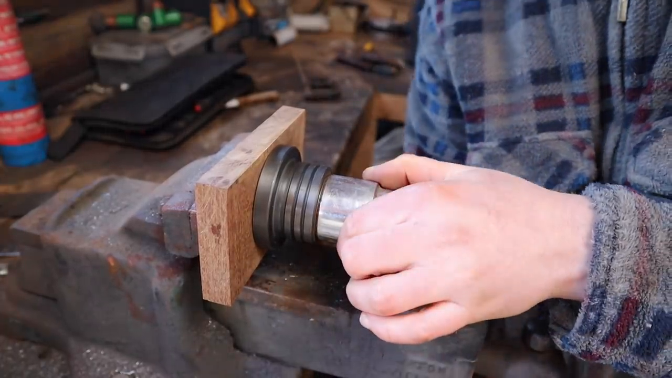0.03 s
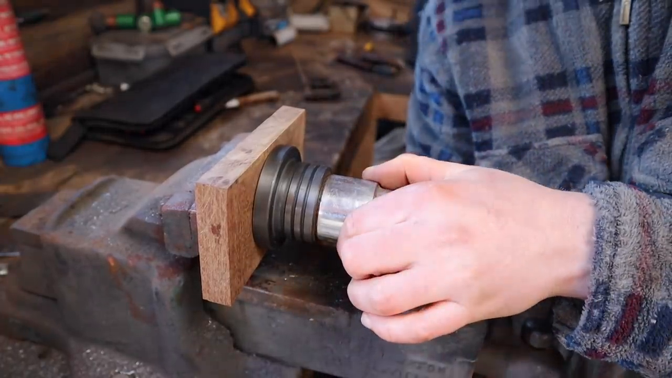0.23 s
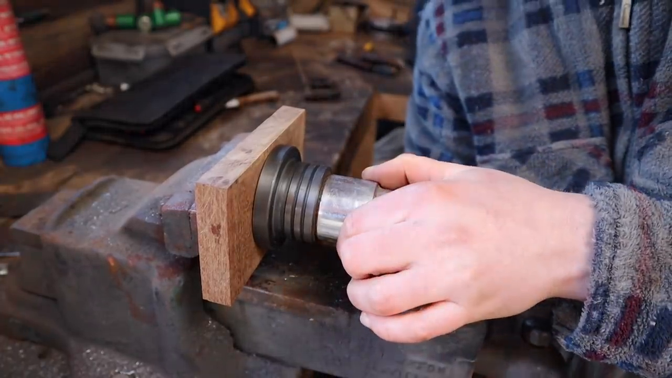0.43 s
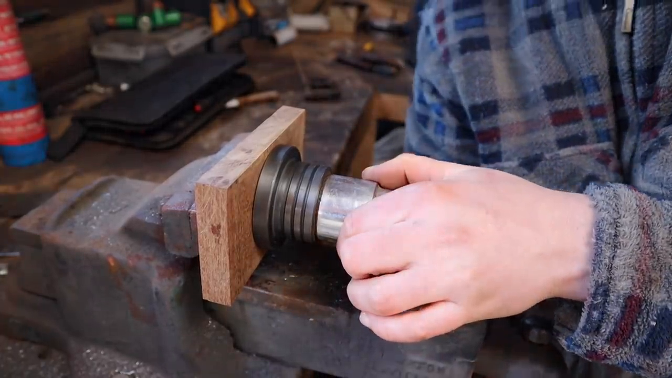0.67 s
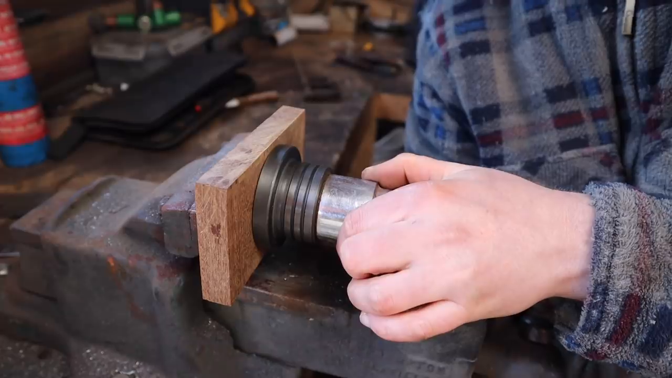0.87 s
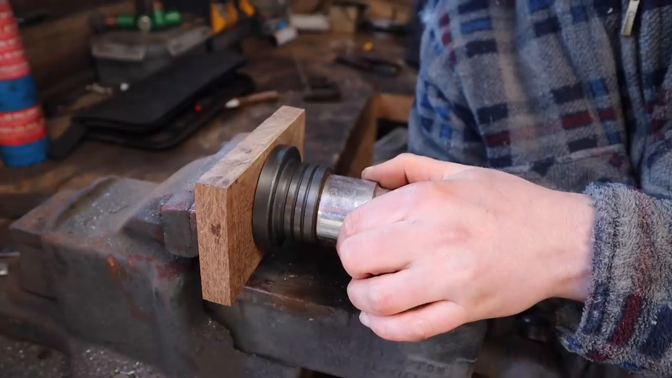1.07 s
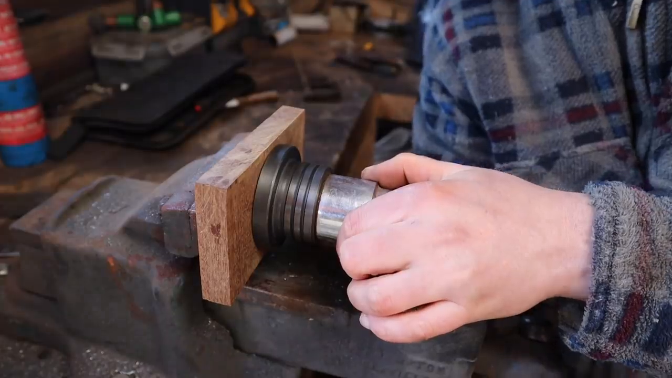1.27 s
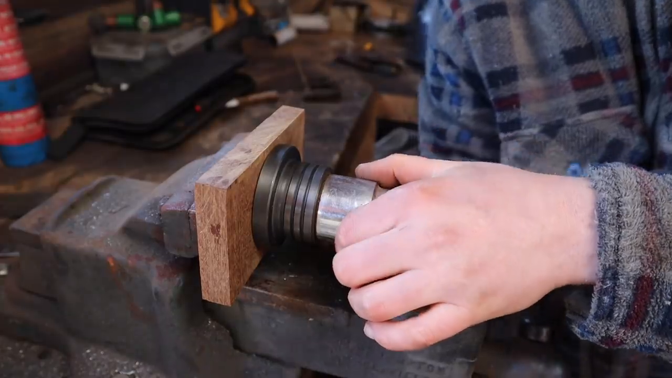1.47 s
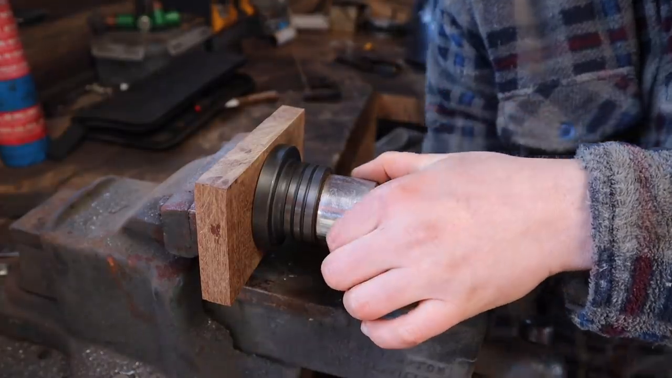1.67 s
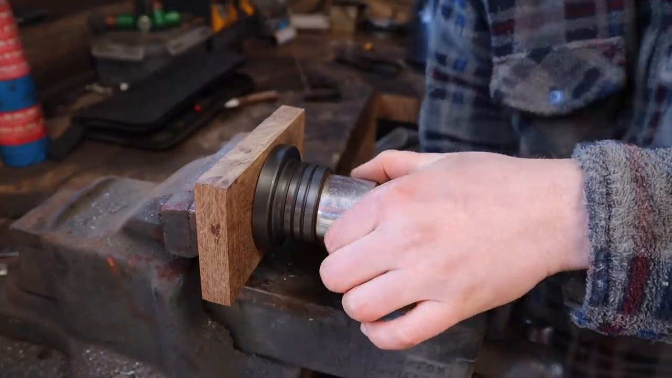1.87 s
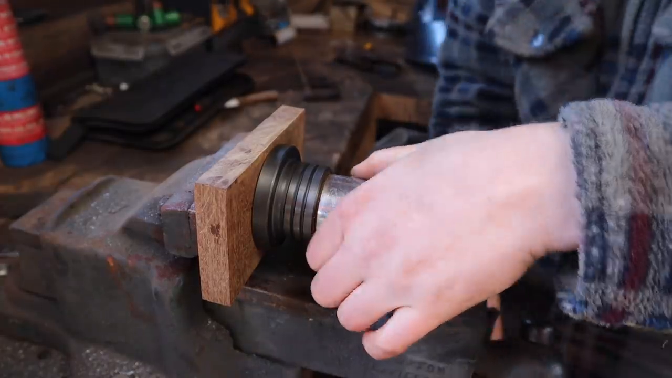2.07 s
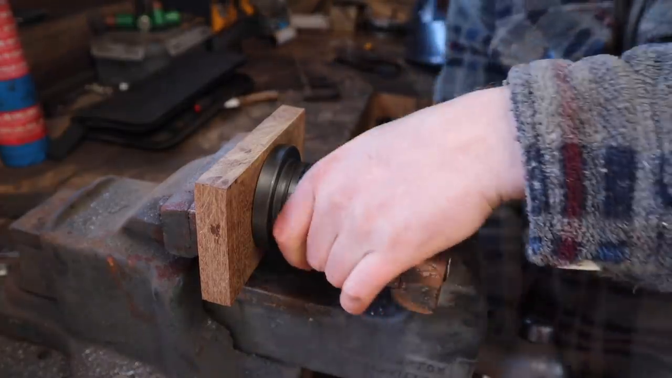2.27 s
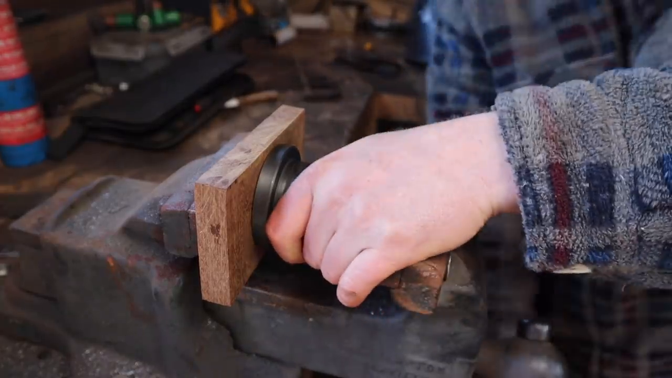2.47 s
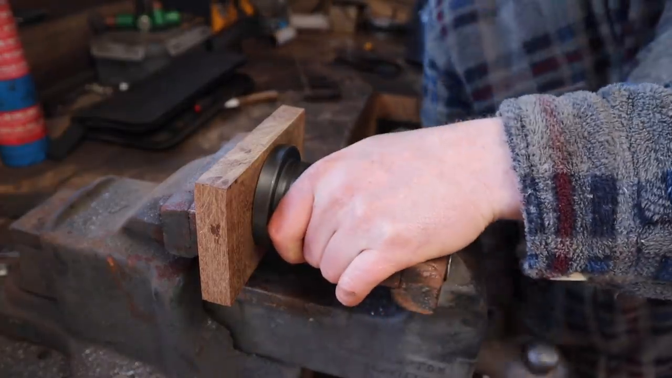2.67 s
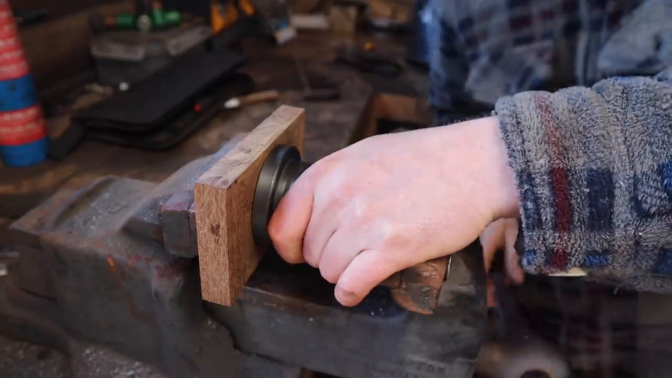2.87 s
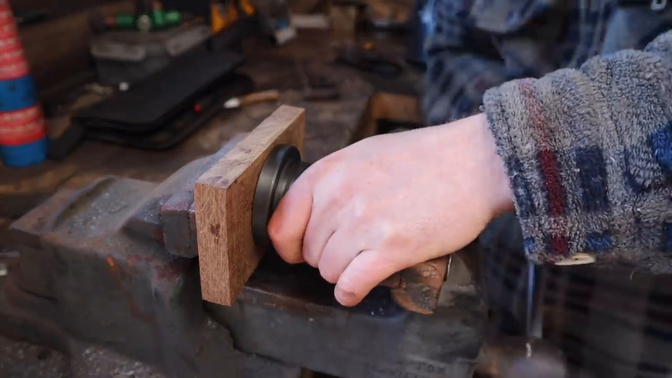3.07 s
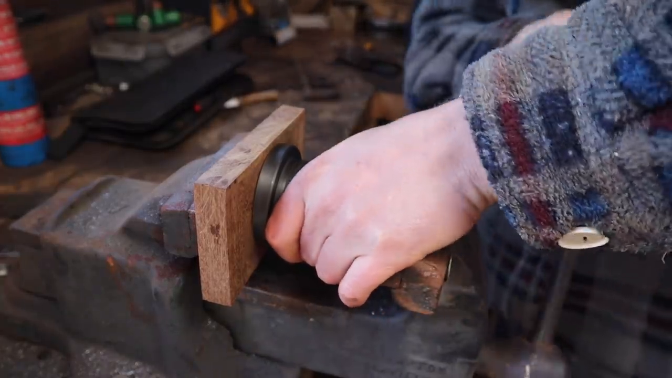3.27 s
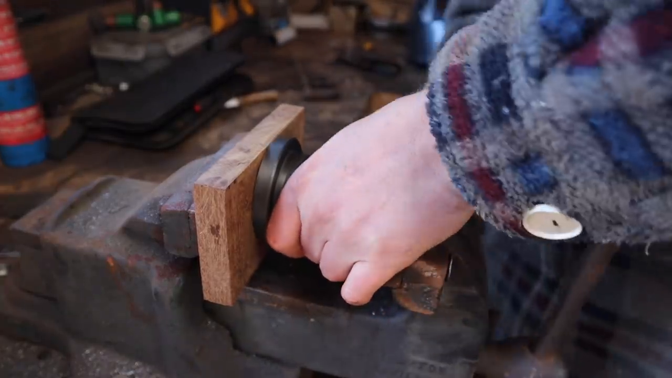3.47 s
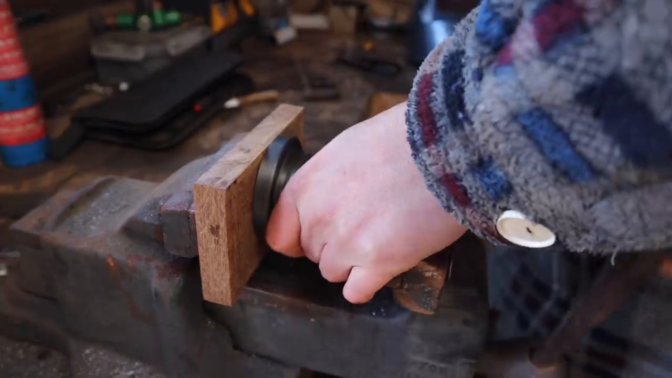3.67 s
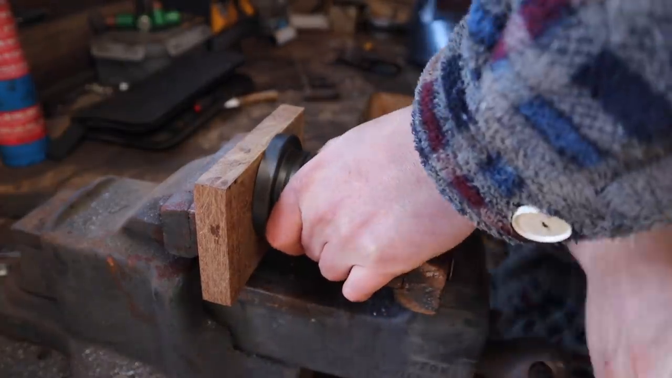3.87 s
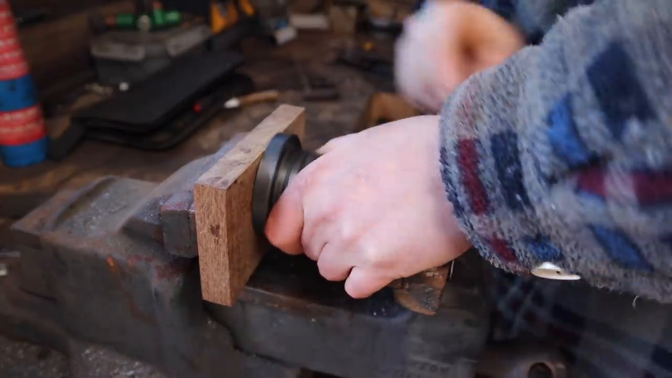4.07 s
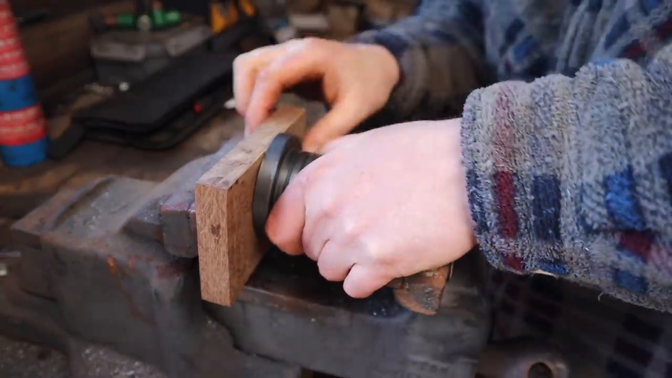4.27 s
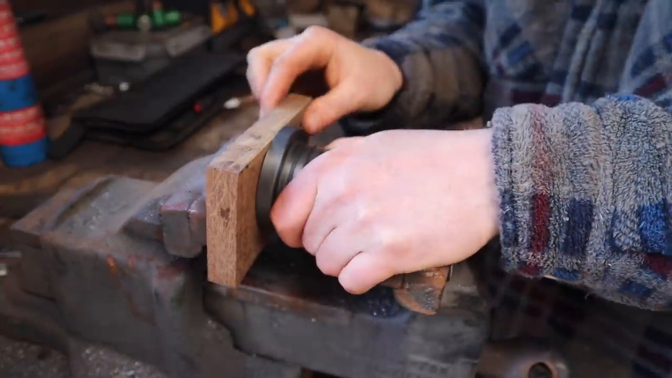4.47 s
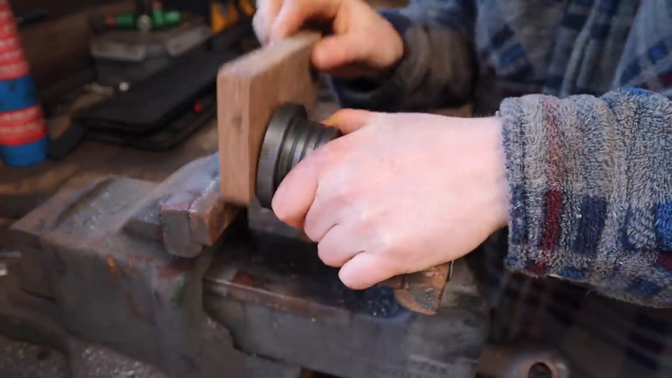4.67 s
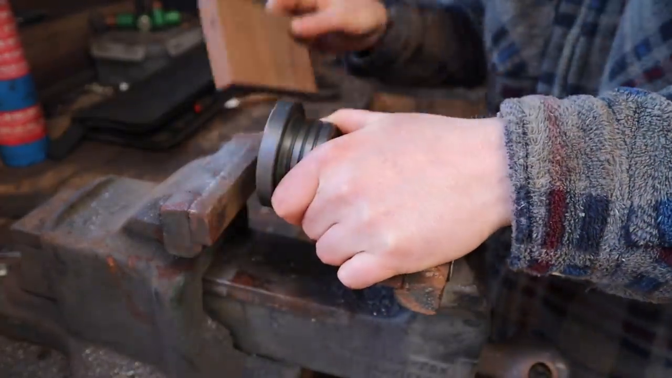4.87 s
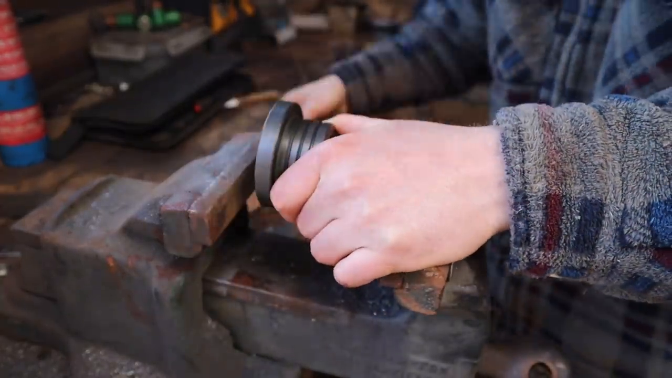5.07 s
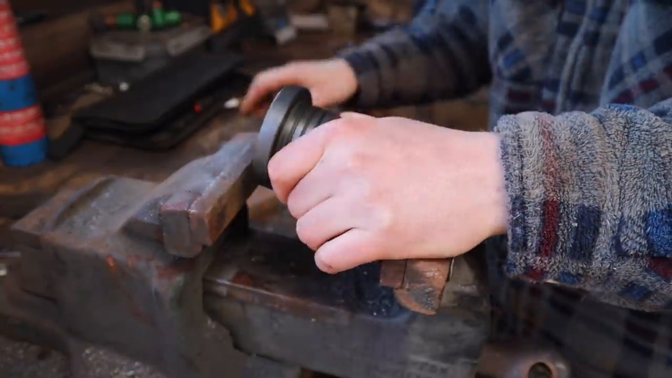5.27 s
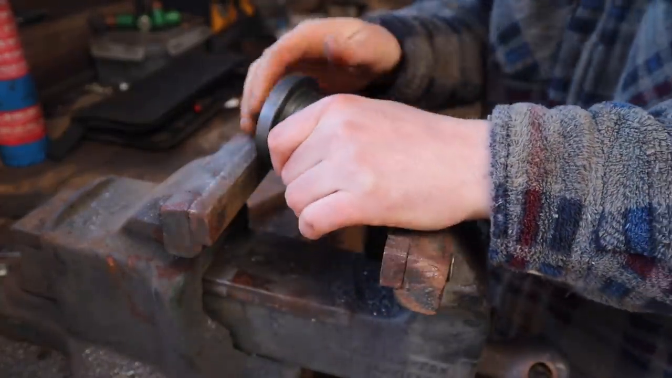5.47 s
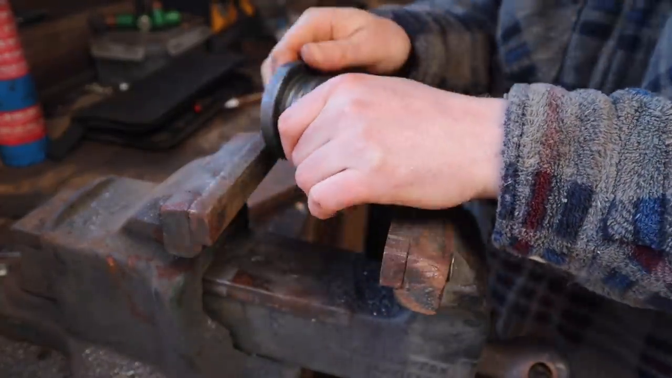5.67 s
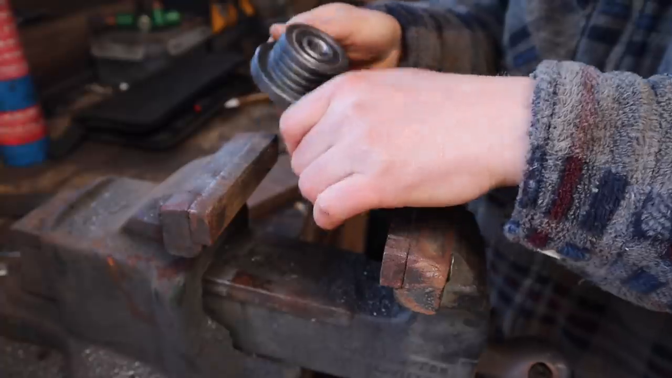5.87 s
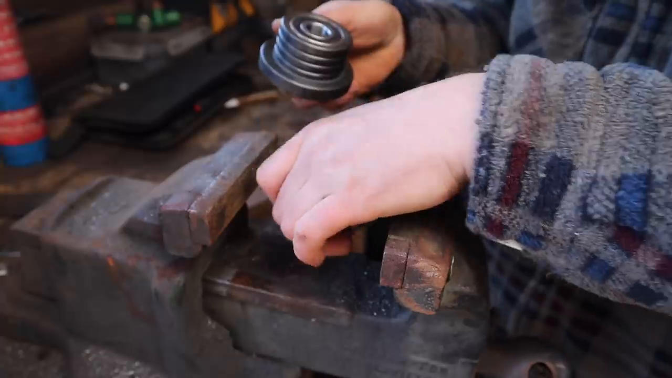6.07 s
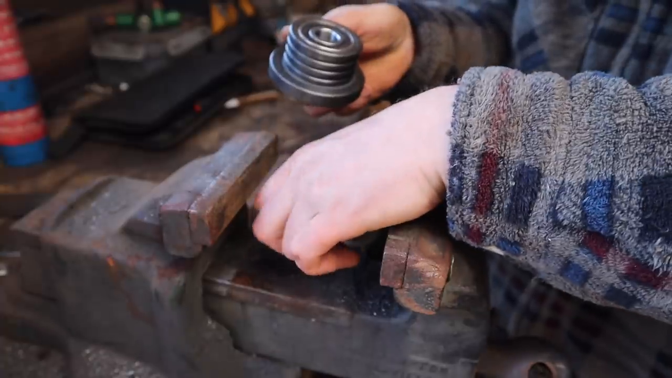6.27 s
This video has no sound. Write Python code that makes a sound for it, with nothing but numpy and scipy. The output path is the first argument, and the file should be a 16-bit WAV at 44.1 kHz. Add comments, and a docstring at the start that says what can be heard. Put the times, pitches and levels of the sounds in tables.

```python
"""Fleece sleeves rustle over the faint hum of a quiet workshop, close to a camera's two small microphones.
A bench vise is loosened: jaw and handle knock the iron and shake the bench, and the screw grinds in its
nut. A wooden block scrapes out, sticking and slipping; then a steel spacer drops, bounces and rings.
The camera widens the stereo picture and clips the highest peaks."""
import sys
import numpy as np
from scipy import signal
from scipy.fft import rfft, irfft, next_fast_len
from scipy.io import wavfile
from scipy.ndimage import uniform_filter1d, map_coordinates

SR = 44100
rng = np.random.default_rng(int(sys.argv[2]) if len(sys.argv) > 2 else 0)


def log_audio(samples):
    """Write samples as a 16-bit WAV file to the path given in sys.argv[1]."""
    # one column per channel
    frames = np.atleast_2d(samples).T
    # limit to full scale, then quantise
    limited = np.clip(frames, -1, 1)
    pcm = np.round(limited * 32767).astype(np.int16)
    wavfile.write(sys.argv[1], SR, pcm)


N = 279569


def undb(db):
    return 10 ** (np.asarray(db) / 20)


def level(x, db):
    """Set the RMS level."""
    return x * undb(db) / np.sqrt(np.mean(x ** 2))


def decay(t, t60):
    return np.exp(-np.log(1000) * t / t60)


def band(x, lo_hz, hi_hz):
    return signal.sosfilt(signal.butter(2, [lo_hz, hi_hz], "band", fs=SR, output="sos"), x)


def curve(rows):
    """Columns of a table joined by straight lines in time."""
    s, *columns = np.transpose(rows)
    return [np.interp(np.arange(N) / SR, s, c, left=-120, right=c[-1]) for c in columns]


def at_hz(points, hz):
    """Points joined by straight lines on a log-frequency axis."""
    freqs, values = np.transpose(points)
    return np.interp(np.log(hz), np.log(freqs), values)


def add(out, s, sound):
    i = int(s * SR)
    out[:, i:i + sound.shape[-1]] += sound[..., :N - i]


def rings(modes, seconds, damping=1):
    """Response of resonances to a tap; each blow lands elsewhere, so signs and sizes change."""
    t = np.arange(int(seconds * SR)) / SR
    hz, width, db = np.transpose(modes)[:, :, None]
    size = undb(db + 0.5 * rng.standard_normal(hz.shape)) * rng.choice([-1, 1], hz.shape) * width
    return np.sum(size * np.exp(-np.pi * width * damping * t) * np.sin(2 * np.pi * hz * t), axis=0)


def grit(per_s, spread_db):
    """Dense clicks of very uneven size."""
    clicks = (rng.random(N) < per_s / SR) * rng.standard_normal(N)
    return clicks * undb(spread_db * rng.exponential(size=N).clip(max=5))


def mic_pair(x, pan_db, lead_us):
    """A close source at the two microphones; positive values make the left louder and earlier."""
    size = x.shape[-1]
    hz, sides = np.fft.rfftfreq(size, 1 / SR), np.array([[.5], [-.5]])
    shade = hz ** 2 / (hz ** 2 + 300 ** 2)  # long waves bend round the camera body
    delay = np.exp(2j * np.pi * hz * sides * lead_us / 10 ** 6)
    return irfft(rfft(x) * undb(sides * pan_db * shade) * delay, size)


def diffuse(size, side_share=1):
    """Noise from all sides: alike at both microphones in the bass, different in the treble."""
    mid, side = rng.standard_normal((2, size))
    side = side_share * signal.sosfilt(signal.butter(1, 1100, "high", fs=SR, output="sos"), side)
    return np.array([mid + side, mid - side])


# The still workshop at the microphones, mid and side: f/Hz, relative density/dB
AIR_MID = [(12, -30), (20, 1), (70, 0), (101, -7.5), (134, -4), (163, -18), (301, -11), (422, -24.5),
           (718, -16), (1090, -24.5), (3340, -31.5), (12400, -41.5), (16000, -78)]
AIR_SIDE = [(12, -65.5), (20, -52.5), (134, -5), (422, 1), (485, -2), (574, -1), (802, -1.5), (3340, -11),
            (9400, -19), (11100, -18), (16000, -39)]
# Hum, centred: f/Hz, half-width/Hz, level/dB
HUM = [(67.5, 3.4, -48), (149, 12.7, -53.5)]
def air():
    """Room tone and microphone hiss, with a faint wavering hum."""
    hz = np.fft.rfftfreq(N, 1 / SR).clip(1)

    def noise(shape, db):
        return level(irfft(rfft(rng.standard_normal(N)) * shape, N), db)

    mid = noise(undb(at_hz(AIR_MID, hz)), db=-44)
    side = noise(undb(at_hz(AIR_SIDE, hz)), db=-47.5)
    for f, width, db in HUM:
        mid += noise(1 / (1 + ((hz - f) / width) ** 2), db)
    return np.array([mid + side, mid - side])


# Sleeves passing near the microphones: peak t/s, fine rustle/dB, coarse brushing/dB, swell/s
STROKES = [(0.172, -57.5, -41, 0.072), (0.392, -73, -48, 0.041), (0.752, -64, -46, 0.085),
           (1.1, -59.5, -44.5, 0.03), (1.51, -58, -43.5, 0.097), (1.97, -61, -40.5, 0.13),
           (2.414, -53, -47, 0.37), (2.58, -50, -46.5, 0.048), (2.898, -63, -52, .15),
           (3.158, -57.5, -59, 0.06), (3.33, -56.5, -51, 0.052), (3.57, -54.5, -38, 0.27),
           (3.99, -51.5, -59, 0.19), (4.12, -49.5, -38, 0.069), (4.996, -56, -45, 0.048),
           (5.46, -57.5, -46.5, 0.035), (5.62, -63, -44, 0.064), (5.82, -58, -42, 0.018),
           (5.95, -60, -46, 0.075)]
def sleeve_strokes(fade_s=0.056):
    """Fine and coarse rustle envelopes: each stroke swells to its peak and fades."""
    t = np.arange(N) / SR
    return sum(undb([[fine_db], [coarse_db]]) * np.exp(np.minimum((t - s) / swell_s, (s - t) / fade_s))
               for s, fine_db, coarse_db, swell_s in STROKES)


# The bench under the vise: f/Hz, width/Hz, gain/dB
BENCH_MODES = [(72, 8.9, 5), (132.1, 8.6, 9), (175, 62, -10), (228, 6.7, 1.5), (276, 14, -1),
               (361, 34, -8.5), (477, 63, -2.5)]
# Hands at work on it: t/s, rumble gain/dB, fleece gain/dB
HANDS = [(0.0, -44.5, -49), (1.38, -43, -48.5), (1.91, -43, -49.5), (2.21, -39, -43.5), (2.5, -46, -44.5),
         (2.9, -39, -40.5), (3.37, -35.5, -45.5), (3.55, -44, -46.5), (3.85, -36, -39), (4.18, -41, -46.5),
         (4.5, -33.5, -41.5), (4.85, -48, -50), (5.1, -38, -48), (5.61, -41, -66), (5.9, -46.5, -51),
         (6.34, -49.5, -50.5)]
def hands(knocks, shudder_s=0.024):
    """Grip, weight and blows rumble through the bench; fleece brushes over fleece and iron."""
    rumble_db, fleece_db = curve(HANDS)
    fine, coarse = sleeve_strokes()
    hold = np.exp(-2 / (shudder_s * SR))  # the bench rumbles on after each blow
    bass_power = signal.lfilter([1 - hold], [1, -hold], band(knocks, 40, 218.6) ** 2)
    shudder = undb(-6.5) * np.sqrt(bass_power)
    bench = signal.fftconvolve(grit(3000, 3.0), rings(BENCH_MODES, .2, damping=4.55))[:N]
    rumble = level(bench, 0) + level(band(rng.standard_normal(N), 58, 1400), -6.5)
    brush = diffuse(N) * (1 + 15 * uniform_filter1d(np.abs(grit(250, 1.4)), size=60))
    fleece = band(brush, 350, 3780) + 0.077 * band(brush, 1200, 2100)
    return (np.hypot(undb(rumble_db), shudder) * level(rumble, -1.82)
            + np.hypot(undb(fleece_db), coarse) * level(fleece, -5)
            + fine * level(band(brush, 7800, 11340), 0.64))


# A cuff button, close by: f/Hz, width/Hz, gain/dB
BUTTON_MODES = [(3420, 250, 5), (4770, 500, -0.5), (7500, 1200, -0.5), (10400, 1970, -10.5),
                (12480, 900, -7.5)]
# Its soft snaps: t/s, relative level/dB, decay/ms
SNAPS = [(0.741, -47, 3), (0.992, -47.5, 4.4), (1.081, -46.5, 3), (1.094, -42, 4), (3.238, -44, 3.2),
         (3.881, -39, 6.2)]
def cuff_snaps(dry):
    """A brief soft crackle rings the button."""
    t = np.arange(SR // 20) / SR
    for s, db, decay_ms in SNAPS:
        touch = diffuse(len(t)) * np.exp(-t * 1000 / decay_ms)
        snap = signal.fftconvolve(touch, rings(BUTTON_MODES, .01)[None], axes=1)[:, :len(t)]
        add(dry, s, level(snap, db - 9.5))


# Decay of struck parts on the bench, at damping 1: f/Hz, t60/s
BODY_T60 = [(100, 0.76), (400, 0.164), (1500, 0.075), (5000, 0.068), (14000, 0.04)]
def dense_modes(colour, hardness, rattle_s, damping, size):
    """Modes too many to count: half-octave noise bands, held while parts rattle, treble dying first."""
    t, hz = np.arange(size) / SR, np.fft.rfftfreq(size, 1 / SR).clip(1)
    centre = 90 * 2 ** np.arange(0, 7.6, .5)[:, None, None]
    windows = np.cos(np.pi * np.log2(hz / centre).clip(-.5, .5)) ** 2
    noise = diffuse(size, side_share=0.4)  # close up, both microphones hear much the same
    bands = irfft(rfft(noise) * windows, size)
    bands *= decay(damping * (t - rattle_s).clip(0), at_hz(BODY_T60, centre))
    bands *= 1 - np.exp(-t * centre * 0.66)  # low modes take longer to build up
    bands /= np.sqrt(np.mean(bands ** 2, axis=(1, 2), keepdims=True))
    db = at_hz(colour, centre) + 10 * np.log10(centre) + hardness * np.log2(centre / 1000)
    return level(np.sum(undb(db) * bands, axis=0), 0)


def blows(dry, wet, table, modes, colour, ring_db, room_db, pan_db, lead_us, low_hz, rise_ms):
    """A quick rattle of contacts rings the struck part and the bench below it."""
    size = 3 * 2 ** 12
    t = np.arange(size) / SR
    fade = np.minimum(1, (t[-1] - t) * 10)
    for s, db, hardness, rattle_ms, thud_db, damping in table:
        contacts = rng.standard_normal(size) * np.exp(-t * 2000 / max(rattle_ms, .3))
        contacts[0] = 5.0  # the first touch is the hardest
        tilted = [(hz, width, gain + 0.94 * hardness * np.log2(hz / 1000)) for hz, width, gain in modes]
        ring, thud = (signal.fftconvolve(contacts, rings(m, size / SR, 1.4 * damping))[:size]
                      for m in (tilted, BENCH_MODES))
        thud *= (1 - np.exp(-t / 0.0039)) ** 2  # the heavy bench answers late
        body = dense_modes(colour, hardness, rattle_ms / 1000, damping, size)
        sound = body + level(ring, ring_db) + level(thud, thud_db)
        sound = band(sound * (1 - np.exp(-t * 1000 / rise_ms)), low_hz, .45 * SR)
        sound = level(sound, db - 17.75)  # the blow fills only a small part of its stretch
        add(dry, s, mic_pair(sound, pan_db, lead_us) * fade)
        send_db = room_db + 0.4958 * (-10 - db)  # softer blows are heard more through the room
        add(wet, s, sound[0] * fade * undb(send_db))


# The iron vise, close and just left of centre: f/Hz, width/Hz, gain/dB
VISE_MODES = [(1199, 43, 14.5), (1317, 8.7, -13), (1590, 71, 5.5), (2340, 48, 2), (2530, 35, 2.5),
              (2900, 62, -18), (3350, 230, -18)]
# Its lesser modes: f/Hz, relative density/dB
VISE_BODY = [(47, -32), (80, 3.5), (515, 9), (993, 0), (1180, 9.5), (2180, -6), (2490, -9), (4700, -17),
             (11300, -58.5), (15000, -78)]
# Knocks: t/s, relative level/dB, hardness/(dB per octave), rattle/ms, bench thud/dB, damping factor
VISE_KNOCKS = [(1.623, -17, -5, 34, -18, 1.7), (1.655, -12, 4, 5, -4.5, 1.25),
               (2.6225, -5, 5.5, 14.4, -10, 3.3), (2.63, -6, 0, 2.4, -5, 0.54),
               (3.348, -25, 0.5, 1.8, -7, 0.88), (3.516, -33, 0.5, 5.5, -16, 2.4),
               (3.556, -34, 0.5, 15, -30, 5.6), (5.007, -35, 4, 5.1, -29, 3.9),
               (6.0105, -9, 2.5, 0.62, -11, 5.5)]
def vise_knocks(dry, wet):
    """Handle and jaw strike the iron."""
    blows(dry, wet, VISE_KNOCKS, VISE_MODES, VISE_BODY,
          ring_db=-5.5, room_db=-13, pan_db=1, lead_us=44, low_hz=50, rise_ms=0.5)


# Hard contacts at the vise, slightly left: t/s, level/dB, f/Hz, t60/s
CLACKS = [(1.6545, -12.5, 1500, 0.033), (1.656, -15, 233.4, 0.13), (1.664, -14, 360, 0.14),
          (2.623, -16, 1241, .09), (2.632, -24.5, 1500, 0.24), (2.637, -15, 285, 0.188),
          (2.636, -27, 700, 0.14), (2.634, -22, 1600, 0.187), (4.6505, -11, 810, 0.045),
          (4.6505, -20.5, 2120, 0.054), (4.6502, -21.5, 3200, 0.0089), (4.7035, -9, 870, 0.022),
          (5.289, -12, 290, 0.085), (6.0102, -3.5, 2000, 0.0079), (3.349, -22, 1630, 0.0425),
          (3.349, -21, 2257, 0.03), (3.359, -24, 560.8, 0.22), (4.7335, -9.5, 913, 0.089),
          (5.132, 0.5, 495, 0.045), (5.132, -26, 4300, 0.019), (5.216, -4, 540, 0.045),
          (5.214, -16, 4100, 0.02), (5.274, -1, 420, 0.011), (5.327, 2.5, 740, 0.028),
          (6.013, -15.5, 590, 0.093), (6.011, -18.5, 3100, 0.036), (6.011, -26, 4805, 0.1)]
def clacks(dry):
    """Where a hard blow lands, one damped resonance stands out."""
    t = np.arange(8192) / SR
    for s, db, hz, t60 in CLACKS:
        mode = band(np.sin(2 * np.pi * hz * t) * decay(t, t60), hz / 2, .45 * SR)
        clack = np.roll(mode, 8) * undb(db) * rng.choice([-1, 1])
        add(dry, s, mic_pair(clack, pan_db=1.4, lead_us=69.4))


# The bed of the vise, slightly left: f/Hz, width/Hz, gain/dB
BED_MODES = [(334, 490, -4), (465, 21, 9.5), (817, 160, 2.5), (1290, 85, -11), (1550, 74, 1.5),
             (2130, 230, -9.5), (2530, 72, -13.5), (4060, 160, -9)]
# Its lesser modes: f/Hz, relative density/dB
BED_BODY = [(47, -45), (80, -18.5), (587, 14), (2090, -4.5), (2330, -17), (2840, -11), (4210, -21),
            (4600, -19.5), (10600, -37.5), (15000, -86)]
# Bumps of the handle: columns as VISE_KNOCKS
HANDLE_BUMPS = [(1.66, -8, -11, 17.2, 1, 1.46), (2.411, -26, -11, 24, -23, 1.7),
                (2.438, -19, -17, 20, -4.5, 0.41), (2.489, -29, -3, 3.5, 11, 0.9),
                (2.558, -21, -18, 9, -25, 1), (3.361, -22, -13, 2.5, -4, 0.74), (3.43, -30, -12, 9, -24, 1),
                (4.079, -25.5, -8.5, 17, -2.5, 0.6)]
def handle_bumps(dry, wet):
    """Dull bumps of the handle ring the bed with a soft onset."""
    blows(dry, wet, HANDLE_BUMPS, BED_MODES, BED_BODY,
          ring_db=4, room_db=-16.5, pan_db=1.5, lead_us=36.5, low_hz=67, rise_ms=3)


# Screw, handle and cuff, wide across the microphones: t/s, starting level/dB, f/Hz, t60/s
TICKS = [(2.411, -47, 6500, 0.12), (3.312, -38, 2100, 0.12), (3.35, -46, 9505, 0.187),
         (4.165, -45.5, 9500, 0.049), (4.369, -38, 9660, 0.072), (4.386, -33.5, 9500, 0.081),
         (4.43, -41, 9530, 0.078), (4.584, -31, 10750, 0.0128), (5.562, -42, 3350, 0.046),
         (5.612, -36, 2220, 0.054), (5.817, -27, 1830, 0.0374), (5.82, -51.5, 9440, 0.21),
         (5.94, -50, 3420, 0.22)]
def ticks(dry):
    """Short bright contacts: noise in one resonance, wider the shorter it lasts."""
    t = np.arange(SR // 5) / SR
    for s, db, hz, t60 in TICKS:
        spread = 1 + min(0.0015 / t60, .4)
        noise = band(diffuse(len(t)), hz / spread, min(hz * spread, .45 * SR))
        add(dry, s, level(noise, db) * decay(t, t60))


# The screw, right of the microphones: f/Hz, width/Hz, gain/dB
SCREW_MODES = [(570, 59, 4), (1000, 69, -5), (2240, 310, -5), (3200, 120, -8), (4830, 120, -18)]
# Its grinding as the handle turns: t/s, level/dB
TURN = [(2.74, -75), (2.83, -44.5), (2.93, -47), (3.02, -49.5), (3.11, -44), (3.25, -54), (3.34, -44),
        (3.45, -68), (3.5, -120)]
def screw():
    """Dense grains of friction in the nut ring the screw."""
    start, size = int(TURN[0][0] * SR), 2 ** 16
    grind = signal.fftconvolve(grit(3000, 1.8)[:size], rings(SCREW_MODES, .05))[:size]
    grind = level(grind, 0) * undb(curve(TURN)[0][start:start + size])
    out = np.zeros((2, N))
    add(out, TURN[0][0], mic_pair(grind, pan_db=-6, lead_us=-50))
    return out


# The wooden block in the jaws, just left of centre: f/Hz, width/Hz, gain/dB
BLOCK_MODES = [(550, 64, -11.5), (858, 105, 3.5), (1268, 47, -16), (1784, 136, -4), (2100, 120, -8),
               (2356, 61, -9.5), (3130, 73, -18), (4230, 117, -13.5)]
# Its lesser modes: f/Hz, relative density/dB
BLOCK_BODY = [(47, -43), (80, -36), (130, -23), (404, -25), (852, 9.5), (3540, -26), (4210, -26),
              (8490, -32.5), (10300, -51), (15000, -79)]
# Its shifting pitch as it slides free: t/s, pitch factor
GLIDE = [(0, 0.93), (4.44, 0.84), (4.51, 1.18), (4.57, 1.1), (4.64, 1.04), (4.7, 0.89), (4.74, 0.95),
         (4.78, 1.08), (4.85, 1.1)]
# Two drags along the jaw, each: t/s, level/dB, relative hiss/dB, extra gain of modes above 1 kHz/dB
DRAGS = [
    [(4.33, -65.5, 5, 2), (4.365, -52.5, 1, -5), (4.388, -31, -17, -2), (4.41, -39.5, -17, -7.5),
     (4.46, -45.5, -8, 1), (4.495, -27, -22.5, 8.5), (4.515, -49.5, 3, 12), (4.535, -34, -20, 14),
     (4.56, -53, -2, 12), (4.6, -76, -30, 4)],
    [(4.6, -79, -31, 1), (4.64, -42, -31, -3), (4.67, -33, -38, -11), (4.706, -23.5, -20, 3),
     (4.75, -26.5, -4.5, 3), (4.778, -32.5, -14, 10), (4.812, -54, -30, 2), (4.85, -54, -22, 17)],
]
def block_scrape():
    """Stick-slip clicks shake the block; its end grain hisses on the jaw teeth."""
    clicks = grit(1800, 2.8)
    glide = curve(GLIDE)[0]

    def gliding(modes, speed):
        ring = signal.fftconvolve(clicks, rings(modes, .1, damping=1.4))[:N]
        return map_coordinates(ring, [np.cumsum(speed)], order=1)

    low = gliding([m for m in BLOCK_MODES if m[0] <= 1000], glide)
    high = gliding([m for m in BLOCK_MODES if m[0] > 1000], glide ** 0.35)  # upper modes glide less
    body = dense_modes(BLOCK_BODY, hardness=4.4, rattle_s=0, damping=1, size=4096)
    rasp = level(signal.fftconvolve(clicks[None], body, axes=1)[:, :N], 0)
    grain = diffuse(N) * (0.5 + np.abs(clicks).clip(0, 3))
    hiss = level(band(band(grain, 9400, 11060), 6700, 17000), 0)
    out = np.zeros((2, next_fast_len(N)))
    for rows in DRAGS:
        silence = (rows[-1][0] + .02, -120, -20, 0)
        db, hiss_db, high_db = curve([*rows, silence])
        ring = (low + undb(high_db) * high) / np.std(low)
        add(out, 0, undb(db) * (ring + rasp + undb(hiss_db) * hiss))
    return mic_pair(out, pan_db=0.6, lead_us=45.4)[:, :N]


# The block on its way out, slightly left: columns as VISE_KNOCKS
BLOCK_TAPS = [(4.390, -16.5, -4.5, 6.4, -24, 0.77), (4.401, -13, -6, 2.2, 6, 0.86),
              (4.428, -15, -16, 17, -9, 0.69), (4.469, -23.5, -6, 6.9, 6, 1.4),
              (4.493, -21.5, -3, 17, 33, 0.35), (4.628, -29, -17, 9, -20, 1.1),
              (4.650, -16, 2.5, 1, -32, 1.1), (4.706, -10, -8.5, 35, 3.5, 1.3),
              (4.716, -16.5, -0.5, 8.4, 1, 0.54), (4.7335, -9.5, -4.5, 1.7, -43, 0.68),
              (4.773, -29, 5, 6.2, -14, 0.73)]
def block_taps(dry, wet):
    """Sharp taps, and a longer rasping rattle near 4.49 s, ring the wood's clear modes."""
    blows(dry, wet, BLOCK_TAPS, BLOCK_MODES, BLOCK_BODY,
          ring_db=7.5, room_db=-13, pan_db=1.5, lead_us=57.5, low_hz=68, rise_ms=0.1)


# The spacer's landings, a little further left: columns as VISE_KNOCKS
SPACER_BOUNCES = [(5.1315, -8, 5, 1.36, -4, 4.9), (5.142, -15.5, -17.5, 9, -11, 0.46),
                  (5.197, -20, -13, 5.5, -22, 2.3), (5.2135, -7, 1, 1.2, -27, 1.55),
                  (5.232, -17, -4, 2, -9, 0.51), (5.273, -8.5, -8.5, 7, -34, 3.1),
                  (5.289, -18.5, -2, 6.7, -13, 0.74), (5.3275, -4.5, 4.5, 3, -35, 3.5),
                  (5.335, -7.5, -2, 9.4, -6, 0.89), (5.369, -13, -3.5, 9.7, -2.5, 0.79),
                  (5.394, -25, -20, 2, -34, 1.4), (5.438, -22, -13, 3.5, -13, 1.5),
                  (5.469, -26.5, -8, 5.3, -15, 4.5), (6.0135, -12.5, 0, 5.46, -9, 1.43),
                  (6.04, -17, -6.5, 49, 3, 1.6)]
def spacer_bounces(dry, wet):
    """The dropped steel spacer clatters on the bed."""
    blows(dry, wet, SPACER_BOUNCES, BED_MODES, BED_BODY,
          ring_db=-3, room_db=-16, pan_db=2.5, lead_us=70, low_hz=167, rise_ms=0.27)


# The spacer's own ring, close and wide: f/Hz, t60/s, gain/dB
SPACER_MODES = [(1130, 0.99, 5), (3760, 0.7, 6.5), (5250, 0.3, -10), (6000, 0.53, -7.5), (6240, 0.5, -6),
                (7526, 0.51, -8.5), (7800, 0.15, -14), (9140, 0.1, -7), (10200, 0.38, -11),
                (10320, 0.27, -6.5), (10800, 0.18, -21.5), (13240, 0.19, -20), (13400, 0.2, -21)]
# Hard landings: t/s, level/dB, then extra gain/dB under 5 kHz, from 7 to 8.5 kHz, above 8.5 kHz
CLINKS = [(5.132, -40, -7, 7, 1), (5.216, -40, -16.5, 6, -3), (5.284, -43.5, -12, -1, -6),
          (5.329, -41, -3.5, 0, 6.5)]
def spacer_clinks(dry, wobble_db=4.5, wobble_s=0.023):
    """Thin steel modes waver as the spacer rocks; the next hard landing stifles the ring."""
    t = np.arange(SR // 2) / SR
    hz, t60, db = np.transpose(SPACER_MODES)[:, :, None]
    for k, (s, hit_db, low_db, mid_db, top_db) in enumerate(CLINKS):
        free_s = CLINKS[k + 1][0] - s if k + 1 < len(CLINKS) else t[-1]
        phase = 2 * np.pi * rng.random(hz.shape)
        split = 2 + 0.5 * rng.standard_normal(hz.shape)  # radians between the microphones
        waves = np.sin(2 * np.pi * hz * t + np.array([phase, phase + split]))
        sway = uniform_filter1d(rng.standard_normal((len(hz), len(t))), int(wobble_s * SR))
        sway_db = wobble_db * sway * np.sqrt(wobble_s * SR)
        extra_db = low_db * (hz < 5000) + np.where(hz > 8500, top_db, mid_db * (hz > 7000))
        ring = np.sum(undb(hit_db + db + extra_db + sway_db) * decay(t, t60) * waves, axis=1)
        stifle = ((free_s - t) * 200 + 1).clip(0, 1)
        add(dry, s, ring * stifle)


# The workshop's short echo, heard from the bench: f/Hz, t60/s
ROOM_T60 = [(60, 0.57), (250, 0.32), (1000, 0.22), (4000, 0.19), (12000, 0.12)]
def room(x):
    """Octave bands of diffuse echo, each fading at its own rate."""
    t, tail = np.arange(SR // 2) / SR, 0
    for hz in 75.25 * 2 ** np.arange(8):
        tail += band(diffuse(len(t)), hz / 2 ** .5, hz * 2 ** .5) * decay(t, at_hz(ROOM_T60, hz))
    tail *= 1 - np.exp(-t / 0.0048)
    return signal.fftconvolve(x, tail / np.sqrt(np.sum(tail ** 2) / 2), axes=1)[:, :N]


def scene():
    """Work at the vise, heard close; the blows and the scrape also reach the walls."""
    dry, wet = np.zeros((2, N)), np.zeros((1, N))
    vise_knocks(dry, wet)
    block_taps(dry, wet)
    spacer_bounces(dry, wet)
    handle_bumps(dry, wet)
    spacer_clinks(dry)
    ticks(dry)
    cuff_snaps(dry)
    clacks(dry)
    drag = block_scrape()
    echo = room(wet + undb(-14.5) * drag[:1])
    return dry + drag + echo + hands(dry[0]) + screw() + air()


def record(dry, widen=1.45, ceiling=.96, top_hz=15800):
    """The camera widens the sides, clips the peaks and cuts the highest treble."""
    mid, side = (dry[0] + dry[1]) / 2, widen * (dry[0] - dry[1]) / 2
    wide = np.clip([mid + side, mid - side], -ceiling, ceiling)
    return signal.sosfilt(signal.ellip(8, .2, 70, top_hz, fs=SR, output="sos"), wide)


dry = scene()
out = record(dry)
log_audio(out)
```